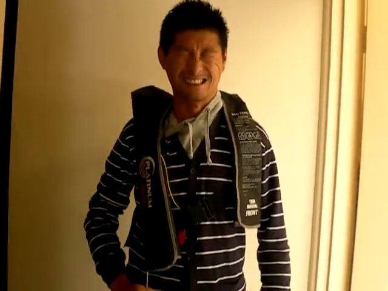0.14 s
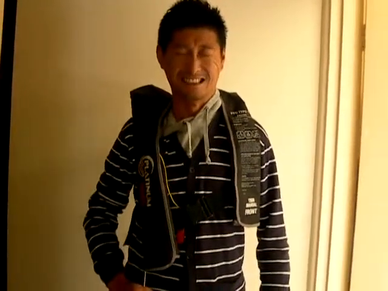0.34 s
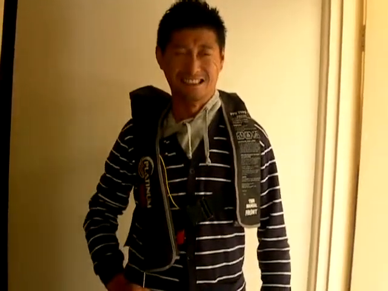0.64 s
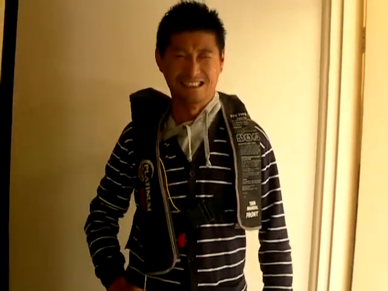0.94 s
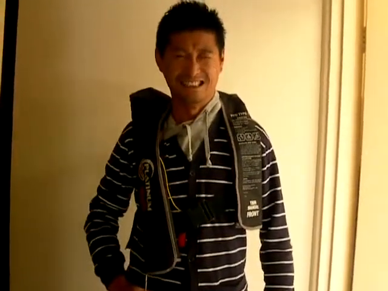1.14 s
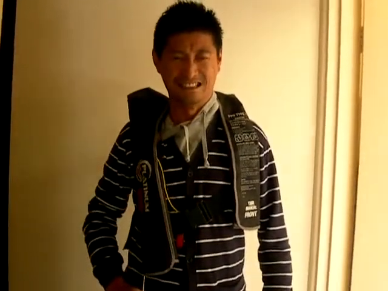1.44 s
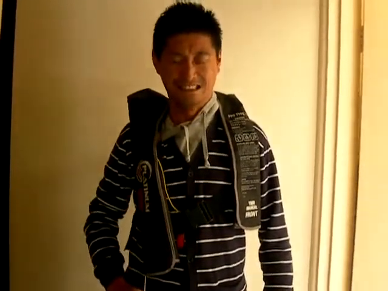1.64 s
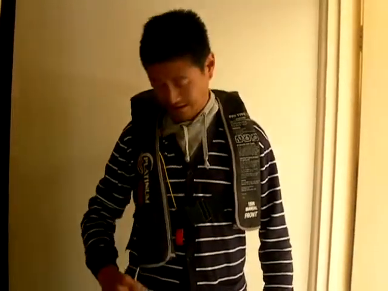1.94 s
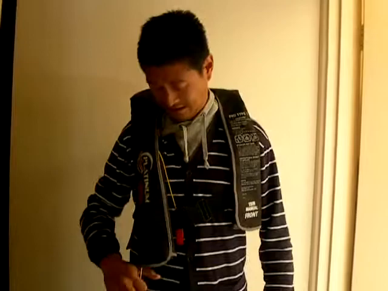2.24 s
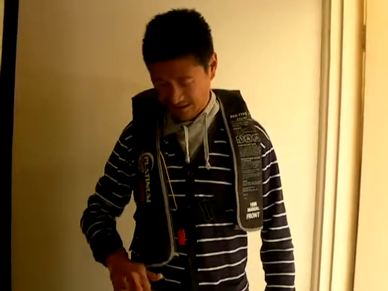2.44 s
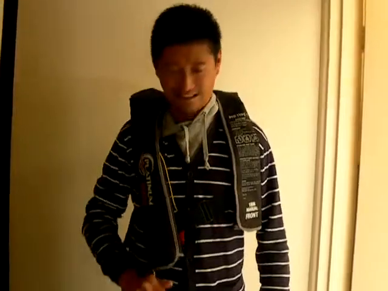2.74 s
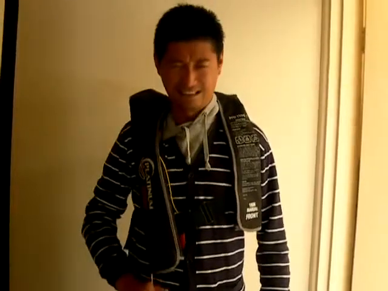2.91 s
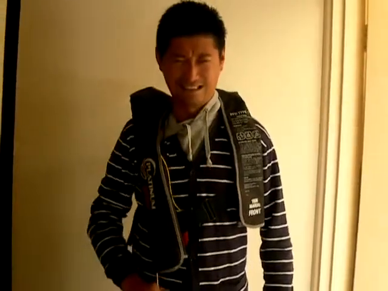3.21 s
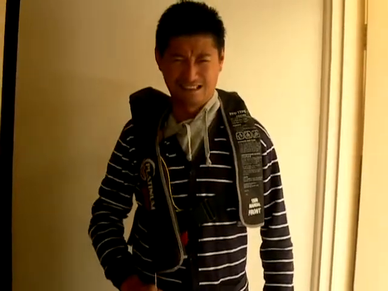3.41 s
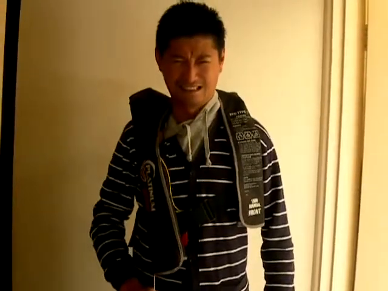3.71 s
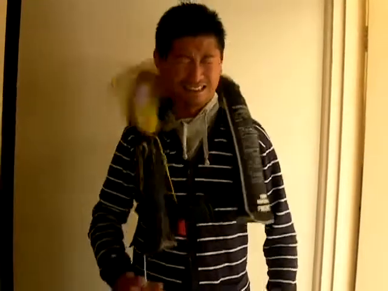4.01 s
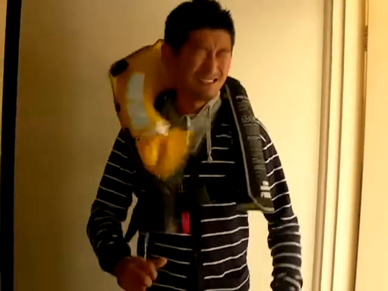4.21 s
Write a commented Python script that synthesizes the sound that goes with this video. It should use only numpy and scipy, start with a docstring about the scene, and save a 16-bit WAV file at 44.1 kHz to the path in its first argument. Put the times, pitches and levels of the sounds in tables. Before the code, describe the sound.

In a small hard-walled room, close to a dull narrow-band microphone, sleeves rustle over faint steady noise. A cord scrapes, a hand bumps padding softly, a toggle knocks plastic and a dry snap follows. Near four seconds a piercing pop overloads the microphone, then gas hisses and roars hollowly into a life jacket, with flapping folds, a brief rip and wavering whistles until the abrupt end.

```python
"""In a small, hard-walled room someone fumbles for the pull cord of a life jacket, close to the microphone.
Plastic fittings click as short pulses that chatter, ring and reflect; cloth rustles as shaped noise.
Then the gas cylinder is pierced with a pop that overloads the narrow-band recorder: turbulent noise hisses
and roars through the air modes of the bladder, short wavering tones swell and fade within the hiss,
and the cover bursts open and unfolds."""
import sys
import numpy as np
from scipy import signal
from scipy.fft import rfft, irfft
from scipy.io import wavfile

SR = 44100
rng = np.random.default_rng(int(sys.argv[2]) if len(sys.argv) > 2 else 0)


def to_wav(sig):
    """Store sig (one row per channel, or 1-D mono) as 16-bit WAV at the path in sys.argv[1].

    Samples outside -1..1 are clipped; the rate is SR.
    """
    pcm = np.clip(np.atleast_2d(sig), -1, 1) * 32767
    pcm = np.round(pcm).astype(np.int16)
    wavfile.write(sys.argv[1], SR, pcm.T)  # frames by channels


N = 192351
TIME = np.arange(N) / SR
OPEN_S, BURST_S = 3.912, 4.272  # the gas starts to flow; the cover bursts open


def gain_of(db):
    """Amplitude factor for a level in dB."""
    return 10 ** (np.asarray(db) / 20)


def evened(x):
    """Brings x to rms 1."""
    return x / np.sqrt(np.mean(x ** 2) + 1e-20)


def since(s):
    """Seconds gone by after a moment, zero before it."""
    return np.maximum(TIME - s, 0)


def read(points, hz):
    """Joins (Hz, value) points on a log-frequency axis."""
    point_hz, value = np.transpose(points)
    return np.interp(np.log(hz + 1), np.log(point_hz + 1), value)


def add(mix, s, sound):
    """Lays a sound into the mix from a given second, cut off at the end."""
    part = mix[round(s * SR):][:len(sound)]
    part += sound[:len(part)]


def coloured(x, points):
    """Gives x a spectrum, at rms 1."""
    shape = gain_of(read(points, np.fft.rfftfreq(N, 1 / SR)))
    return evened(irfft(rfft(x) * shape, N))


def wander(rate_hz):
    """Slow chance variation, faint above the given rate, at rms 1."""
    hz = np.fft.rfftfreq(N, 1 / SR)
    smooth = rfft(rng.standard_normal(N)) / (1 + (hz / rate_hz) ** 4)
    return evened(irfft(smooth, N))


def resonate(x, hz, width):
    """A resonance of gain 1 whose frequency may follow a curve."""
    turn = np.exp(2j * np.pi * np.cumsum(hz * np.ones(len(x))) / SR)
    r = np.exp(-np.pi * width / SR)
    # shift the resonance down to 0 Hz, smooth there, shift back
    smoothed = signal.lfilter([1 - r], [1, -r], x / turn + 1e-18)
    return 2 * (turn * smoothed).real


def push(centre_hz, octaves, size=4096):
    """One causal pulse of force: the harder the contact, the higher its centre."""
    hz = abs(np.fft.fftfreq(size, 1 / SR)) + 1
    log_gain = -2 * np.log(1 + (np.log2(hz / centre_hz) / octaves / 2) ** 2 * 2)
    # the minimum phase for this spectrum puts the force after the contact
    return np.fft.ifft(np.exp(np.conj(signal.hilbert(log_gain)))).real[:size // 2]


# How long the small room rings. Each row: frequency in Hz, time to fall 60 dB in seconds.
ROOM_DECAY = [(150, 0.74), (700, 0.32), (1800, 0.41), (4000, .26)]


def room(x, delay=.005):
    """Dense reflections from near walls, each band dying at its own speed."""
    taps = rng.choice([-1., 1.], SR // 2) * (rng.random(SR // 2) < 3000 / SR)
    taps[:round(delay * SR)] = 0
    hz, t, bands = signal.stft(taps, SR, nperseg=256)
    decay = np.exp(-np.log(1000) * t / read(ROOM_DECAY, hz)[:, None])
    tail = signal.istft(bands * decay, SR, nperseg=256)[1]
    return signal.fftconvolve(x, tail / np.linalg.norm(tail))[:N]


def blows(rows, modes, ring_db):
    """Each blow chatters briefly, rings with the given modes and is thrown back by the room."""
    t = np.arange(SR // 8) / SR
    body = np.zeros(len(t))
    for hz, db, t60 in modes:
        body += gain_of(db) * np.exp(-np.log(1000) * t / t60) * np.cos(2 * np.pi * hz * t)
    body *= gain_of(ring_db)
    body[0] += 1  # the force itself is heard beside the ring
    direct, sent = np.zeros((2, N))
    for s, db, centre_hz, octaves, chatter_s, room_db in rows:
        # the first contact is followed by a fading run of tiny slips
        contact = 0.1 * rng.standard_normal(len(t)) * np.exp(-t / chatter_s)
        contact[0] = 1
        force = signal.fftconvolve(push(centre_hz, octaves), contact)
        blow = signal.fftconvolve(force, body)
        # the level counts the energy of the whole blow as rms over 5 ms
        blow *= gain_of(db) * np.sqrt(.005 * SR) / np.linalg.norm(blow)
        add(direct, s, blow)
        add(sent, s, blow * gain_of(room_db))
    return direct + room(sent)


def rebounds(first, gap_s, gap_ratio, fall_db, hz_ratio, count):
    """Rows for a blow and its repeats: each is weaker, with gap and centre changed by a fixed ratio."""
    s, db, centre_hz, *contact = first
    gaps = gap_s * gap_ratio ** np.arange(count - 1)
    times = s + np.cumsum([0, *gaps])
    return [(at, db - k * fall_db, centre_hz * hz_ratio ** k, *contact) for k, at in enumerate(times)]


def follower(blow, lag_s, below_db, centre_hz, octaves, chatter_s):
    """Row for a second part that a blow sets off a moment later."""
    s, db, room_db = blow[0], blow[1], blow[-1]
    return [(s + lag_s, db - below_db, centre_hz, octaves, chatter_s, room_db)]


def alike(rows, octaves, chatter_s, room_db):
    """Rows for blows that share one kind of contact."""
    return [(*row, octaves, chatter_s, room_db) for row in rows]


# Steady background in the room. Each row: frequency in Hz, relative level in dB per Hz.
BACKGROUND = [(20, 2), (60, -11), (120, -2), (250, 0.5), (400, 2.5), (700, -1), (1500, -1.5), (3000, -1.5),
              (3600, -3), (4100, -5.5), (4600, -14)]


def background(level_db=-49):
    """Steady noise with a fixed spectrum lies under everything."""
    return gain_of(level_db) * coloured(rng.standard_normal(N), BACKGROUND)


# Colour of the rubbing cloth. Each row: frequency in Hz, relative level in dB per Hz.
CLOTH_COLOUR = [(100, -34.5), (280, -4), (420, 1), (650, -1), (950, 2), (1400, -8), (3000, -24)]
# Strokes of the sleeves. Each row: middle in seconds, length in seconds, peak level in dB before the grain.
SLEEVE_STROKES = [(.08, .45, -53), (1.94, .26, -49.3), (2.27, .17, -53), (2.62, .36, -49.3),
                  (3.25, .8, -53.5), (3.83, .1, -49)]


def sleeves(rest_db=-58, grain_db=1.76):
    """Cloth rubs in uneven strokes as the arm moves; each swells and fades over a faint steady rustle."""
    power = gain_of(rest_db) ** 2
    for middle, length, db in SLEEVE_STROKES:
        swell = np.cos(np.pi * np.clip((TIME - middle) / length, -.5, .5))
        power = power + (gain_of(db) * swell) ** 2
    grain = gain_of(grain_db * wander(35))
    return coloured(rng.standard_normal(N), CLOTH_COLOUR) * np.sqrt(power) * grain


# Short ring shared by the knocks, scrape, bumps, thumps and flaps.
# Each row: frequency in Hz, relative level in dB, time to fall 60 dB in seconds.
SHARED_MODES = [(265, -10.5, 0.15), (778, -2.5, .04), (956, -4, 0.036), (1370, -16, 0.027),
                (1525, -8.5, .04), (1990, -7, 0.033), (3100, -12, .02)]
# The cord scrapes over a plastic edge. One row: start in seconds, level in dB, centre in Hz,
# spread in octaves, chatter in seconds, send to the room in dB.
CORD_SCRAPE = (0.4662, -30.8, 2600, 1.4, 0.007, -4.3)
# The toggle knocks against the buckle. One row: start in seconds, level in dB, centre in Hz,
# spread in octaves, chatter in seconds, send to the room in dB.
TOGGLE_KNOCK = (2.8522, -20, 960, 0.5, 0.0022, -7)
# Soft bumps of the hand on the padded cover. Each row: start in seconds, level in dB, centre in Hz.
HAND_BUMPS = [(0.674, -46, 710), (1.661, -38, 700), (3.009, -34, 620), (3.4875, -35, 370)]


def fumbling():
    """The cord scrapes in slips; the toggle knocks, cracks on an edge, meets padding; the hand bumps."""
    scrape = rebounds(CORD_SCRAPE, gap_s=.0062, gap_ratio=.9, fall_db=1, hz_ratio=1.1, count=3)
    knock = rebounds(TOGGLE_KNOCK, gap_s=.0102, gap_ratio=.76, fall_db=3.8, hz_ratio=1.04, count=3)
    edge = follower(TOGGLE_KNOCK, lag_s=.0018, below_db=5.6, centre_hz=2100, octaves=.66, chatter_s=.007)
    padding = follower(TOGGLE_KNOCK, lag_s=.018, below_db=12, centre_hz=400, octaves=.9, chatter_s=.0035)
    bumps = alike(HAND_BUMPS, octaves=.75, chatter_s=.012, room_db=-5)
    return blows(scrape + knock + edge + padding + bumps, SHARED_MODES, ring_db=-40.5)


# A dry snap right at the microphone. Each row: start in seconds, level in dB, centre in Hz,
# spread in octaves, chatter in seconds, send to the room in dB.
SNAP_CONTACTS = [(3.2462, -28, 950, .4, .0005, -24), (3.2497, -26.5, 2600, 0.45, 0.0015, -37),
                 (3.2507, -17.2, 680, 1.15, 0.00088, -22)]
# Ring of the camera's case. Each row: frequency in Hz, relative level in dB, time to fall 60 dB in seconds.
CASE_MODES = [(88, -5, .1), (297, -23, 0.029), (750, -13, 0.082), (883, 1, .022), (958, -7, .018),
              (1244, 1.5, 0.026), (2320, -6, 0.019), (3210, -3, 0.019)]


def snap():
    """Three contacts in quick succession ring the camera's case, with little of the room."""
    return blows(SNAP_CONTACTS, CASE_MODES, ring_db=-26)


# The firing pin strikes. One row: start in seconds, level in dB, centre in Hz,
# spread in octaves, chatter in seconds, send to the room in dB.
PIN_STRIKE = (3.9048, -3, 930, .55, .001, -19)
# The seal bursts. One row: start in seconds, level in dB, centre in Hz,
# spread in octaves, chatter in seconds, send to the room in dB.
SEAL_BURST = (3.9125, -2.8, 1300, 1.5, 0.0048, -12)
# Ring of the metal inflator and cylinder.
# Each row: frequency in Hz, relative level in dB, time to fall 60 dB in seconds.
INFLATOR_MODES = [(358, -11, .05), (473, -10, 0.031), (863, -3.5, 0.012), (1042, 0, 0.025),
                  (1487, -11.5, 0.028), (1783, -12, 0.021), (2075, -4, .04), (2410, -7, 0.04),
                  (3070, -11, 0.02)]
# The first gas thumps into the folded bladder. One row: start in seconds, level in dB, centre in Hz,
# spread in octaves, chatter in seconds, send to the room in dB.
BLADDER_THUMP = (3.9115, -19, 125, 1.1, 0.004, -22)
# Folds of the bladder flap open. Each row: start in seconds, level in dB, centre in Hz.
FOLD_FLAPS = [(3.944, -24, 440), (3.987, -36, 270), (4.151, -33.5, 225), (4.29, -27.5, 340),
              (4.345, -29, 380)]


def firing():
    """The pin pierces the cylinder, the inflator rattles from the burst, the bladder thumps and flaps."""
    rattle = rebounds(SEAL_BURST, gap_s=.0085, gap_ratio=.95, fall_db=12, hz_ratio=1, count=3)
    thumps = rebounds(BLADDER_THUMP, gap_s=.028, gap_ratio=1, fall_db=12, hz_ratio=1, count=2)
    flaps = alike(FOLD_FLAPS, octaves=.45, chatter_s=.007, room_db=-8)
    metal = blows([PIN_STRIKE] + rattle, INFLATOR_MODES, ring_db=-17)
    return metal + blows(thumps + flaps, SHARED_MODES, ring_db=-42.5)


def valve_open(rise=0.0067):
    """The pierced seal lets the gas through within milliseconds."""
    return np.clip(since(OPEN_S) / rise, 0, 1)


# Hiss at the nozzle. Each row: frequency in Hz, relative level in dB per Hz.
JET_COLOUR = [(500, -35), (1200, -10.5), (1500, -2), (1700, -1.5), (1860, 4.5), (2250, 1), (2700, 2.5),
              (3300, 2), (3700, -3.5), (4200, -6.5), (4800, -10.5)]
JET_DB, JET_SAG_DB_PER_S, UNCOVER_DB_PER_S = -22.2, 6.5, 60  # sags as the cylinder empties, grows uncovered
RIP_S, RIP_LENGTH_S, RIP_DB = 4.092, .016, 3.1  # the fastener gives way in one short rip


def jet(flutter_db=0.9, crackle_db=-9, crackles_per_s=350):
    """Turbulent hiss and sparse crackle, swelling briefly as the cover's fastener rips."""
    rip = np.exp(-((TIME - RIP_S) / RIP_LENGTH_S) ** 2)
    jet_db = JET_DB - JET_SAG_DB_PER_S * since(OPEN_S) + RIP_DB * rip
    jet_db += UNCOVER_DB_PER_S * since(BURST_S)
    hiss = coloured(rng.standard_normal(N), JET_COLOUR) * gain_of(flutter_db * wander(46))
    clicks = rng.standard_normal(N) * (rng.random(N) < crackles_per_s / SR)
    crackle = gain_of(crackle_db) * coloured(clicks, JET_COLOUR)
    return (hiss + crackle) * gain_of(jet_db)


def unfolding(x, near_s=.0022, growth=.003, share=0.25):
    """The swelling bladder wall reflects the hiss from ever farther, so its bands slide down."""
    delay = near_s + growth * since(OPEN_S)  # seconds
    reflection = np.interp(TIME - delay, TIME, x)
    return (x + share * reflection) / np.sqrt(1 + share ** 2)


# Air modes of the bladder. Each row: frequency in Hz, width in Hz, relative gain in dB.
AIR_MODES = [(250, 40, -18.5), (387, 66, -5.5), (431, 26, -5.5), (565, 54, -3.5), (677, 61, -5.5),
             (854, 71, 0), (1007, 114, 0.5), (1120, 55, -3.5)]
HOLLOW_DB, HOLLOW_SAG_DB_PER_S, BURST_DB = -24.7, 14, 7  # choked as the cover tightens, then freed
SURGE_DB, SURGE_S = 9, .025  # the first rush into the empty bladder


def bladder(stretch=0.021, lowest_hz=230, release_s=.006):
    """Noise from the jet excites air modes that waver as the bladder changes shape."""
    filling = since(OPEN_S)
    freed = 1 - np.exp(-since(BURST_S) / release_s)
    surge_db = SURGE_DB * np.exp(-filling / SURGE_S)
    hollow_db = HOLLOW_DB + surge_db - HOLLOW_SAG_DB_PER_S * filling + BURST_DB * freed
    roar = np.zeros(N)
    for hz, width, db in AIR_MODES:
        wavering_hz = hz * (1 + stretch * wander(3))
        roar += gain_of(db) * resonate(rng.standard_normal(N), wavering_hz, width)
    band = signal.butter(2, [lowest_hz, 1400], "bandpass", fs=SR, output="sos")
    return evened(signal.sosfilt(band, roar)) * gain_of(hollow_db)


# Brief narrow tones within the hiss. Each row: start in seconds, end in seconds, start frequency in Hz,
# end frequency in Hz, rms level at the middle in dB.
HISS_TONES = [(4.097, 4.153, 1120, 990, -27.7), (4.165, 4.206, 1020, 1060, -29.5),
              (4.299, 4.42, 2940, 3040, -27)]


def hiss_tones(waver=0.011):
    """Short gliding, wavering sine tones that swell and fade."""
    out = np.zeros(N)
    for start, end, start_hz, end_hz, db in HISS_TONES:
        count = max(round((end - start) * SR), 2)
        hz = np.linspace(start_hz, end_hz, count) * (1 + waver * wander(90)[:count])
        tone = np.sqrt(2) * np.sin(2 * np.pi * np.cumsum(hz) / SR)
        add(out, start, gain_of(db) * np.hanning(count) * tone)
    return out


def scene():
    """Background and handling first, then the firing and the gas."""
    handling = sleeves() + fumbling() + snap()
    gas = valve_open() * (unfolding(jet()) + bladder()) + hiss_tones()
    return (background() + handling + firing() + gas)[None]


def low_pass(x, edge_hz):
    """A steep linear-phase cut above the edge."""
    taps = signal.firwin(255, edge_hz, window=("kaiser", 9), fs=SR)
    return signal.oaconvolve(x, taps[None], "same")


def record(dry, roll_off_hz=3650, voice_band_hz=4800, edge_hz=15800, ceiling=.72, offset=0.022, drift=0.0027):
    """A narrow-band channel with a drifting offset; the pop clips after it and so splashes into the treble."""
    dull = signal.sosfilt(signal.butter(5, roll_off_hz, fs=SR, output="sos"), dry)
    narrow = low_pass(dull, voice_band_hz)
    clipped = narrow / (1 + (narrow / ceiling) ** 16) ** (1 / 16)
    biased = clipped - offset + drift * wander(2.1)
    return low_pass(biased, edge_hz)


dry = scene()
out = record(dry)
to_wav(out)
```